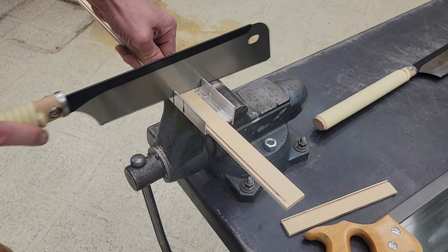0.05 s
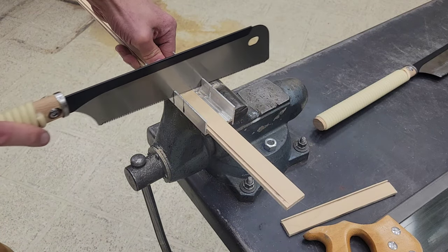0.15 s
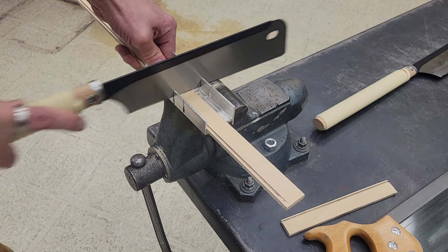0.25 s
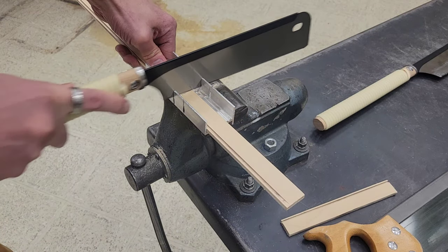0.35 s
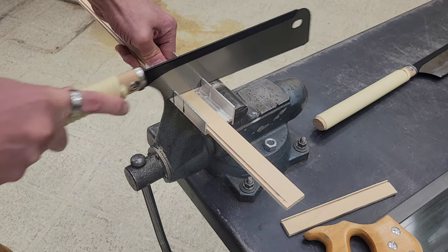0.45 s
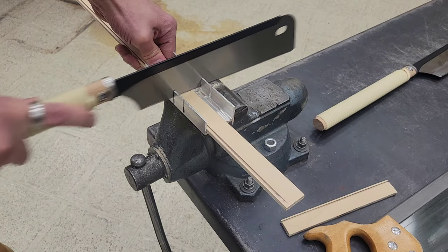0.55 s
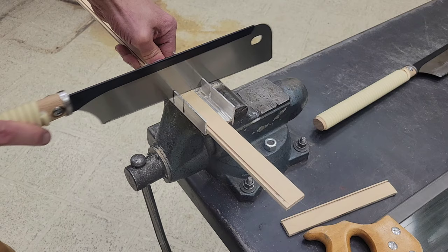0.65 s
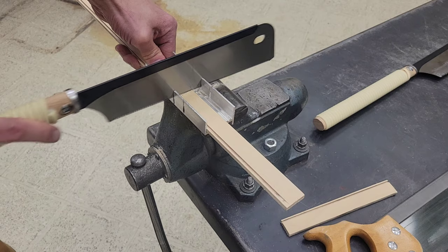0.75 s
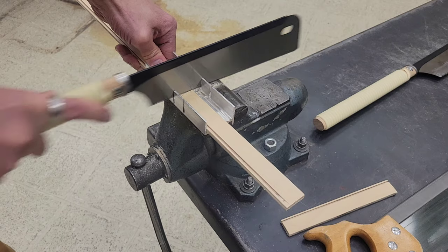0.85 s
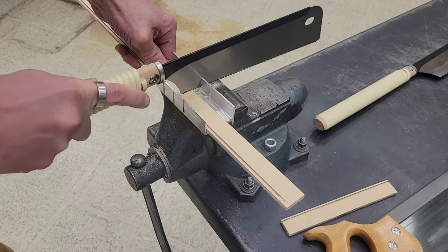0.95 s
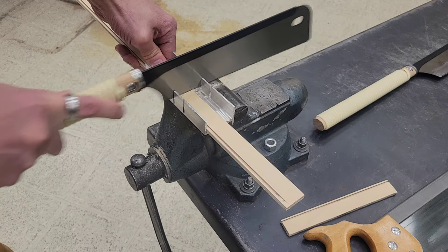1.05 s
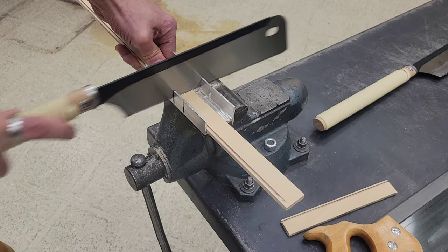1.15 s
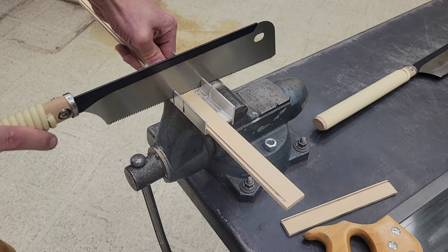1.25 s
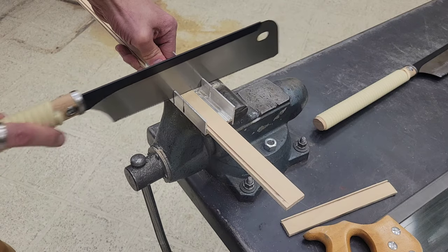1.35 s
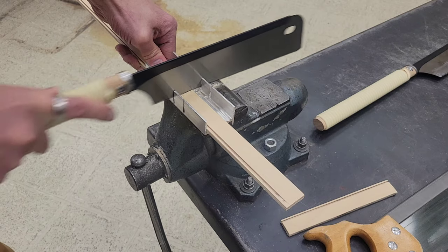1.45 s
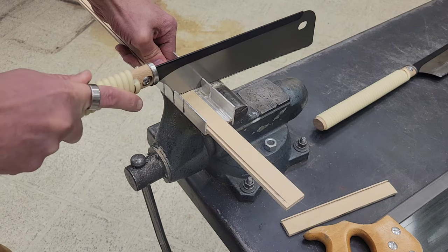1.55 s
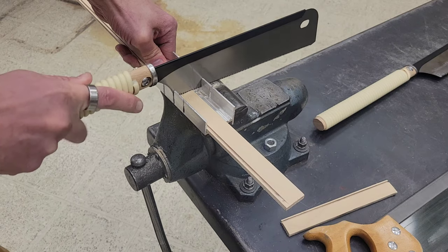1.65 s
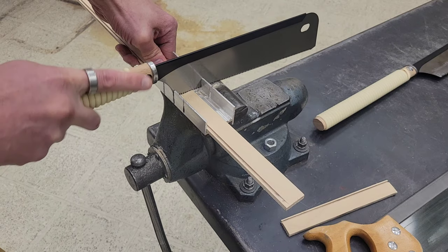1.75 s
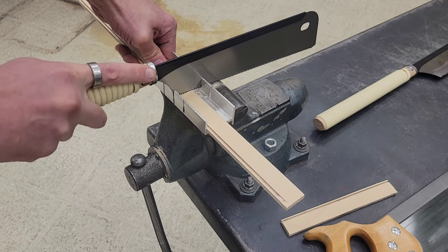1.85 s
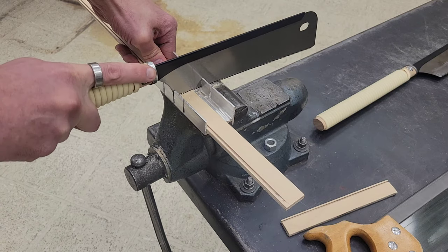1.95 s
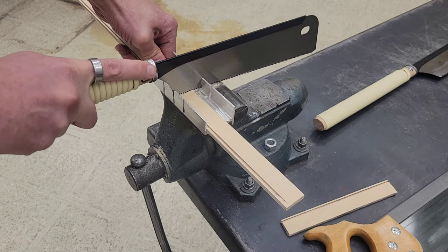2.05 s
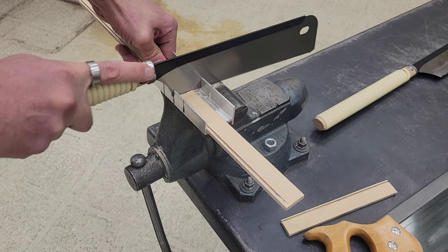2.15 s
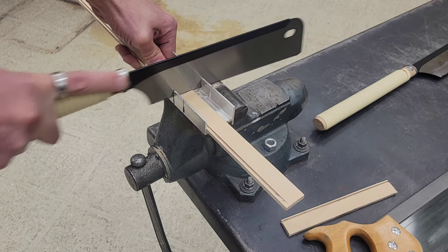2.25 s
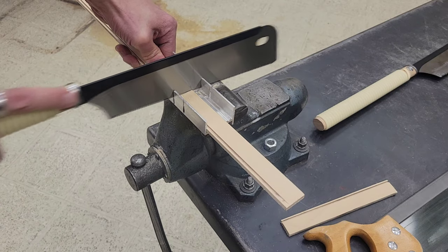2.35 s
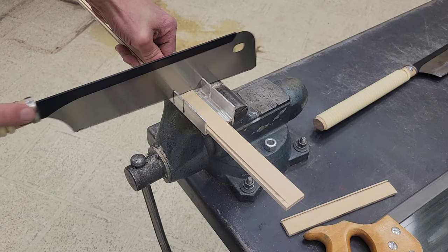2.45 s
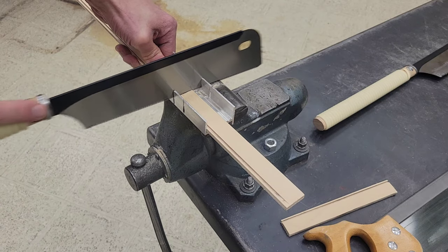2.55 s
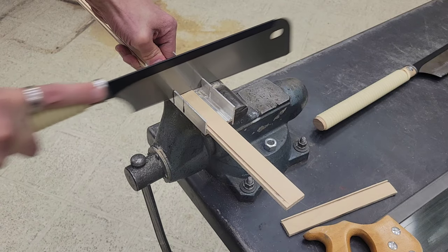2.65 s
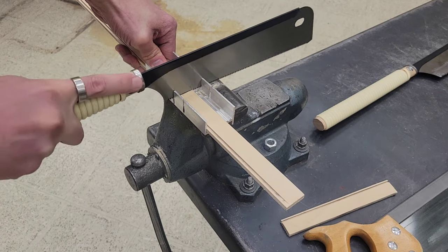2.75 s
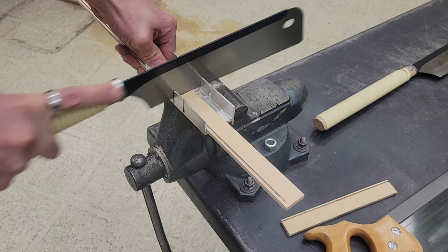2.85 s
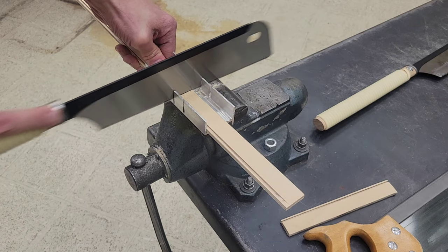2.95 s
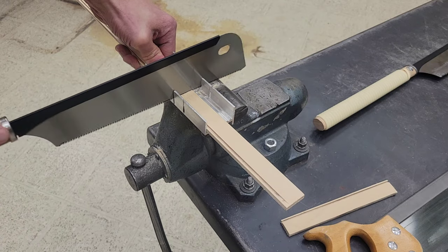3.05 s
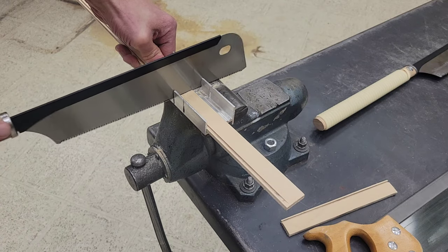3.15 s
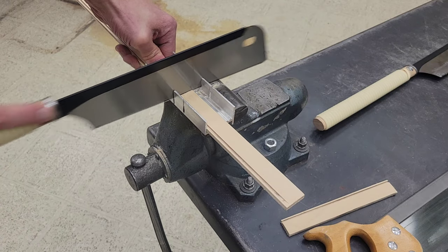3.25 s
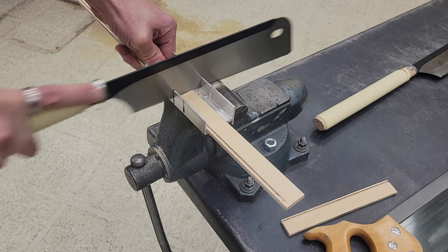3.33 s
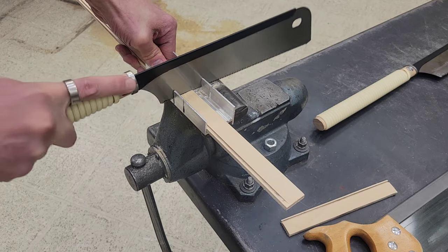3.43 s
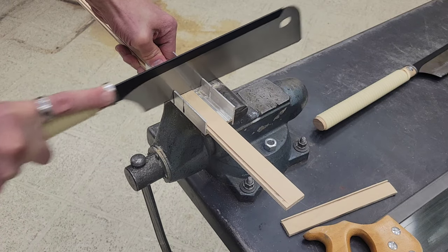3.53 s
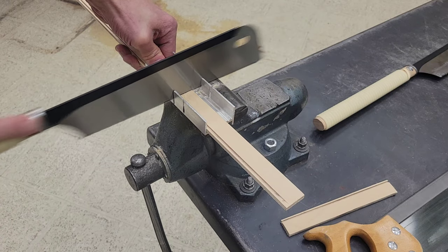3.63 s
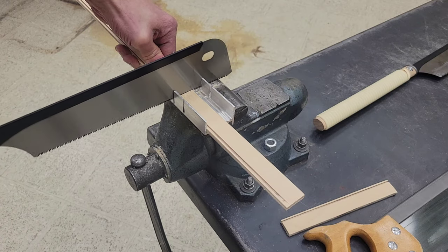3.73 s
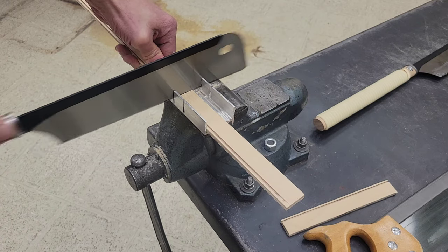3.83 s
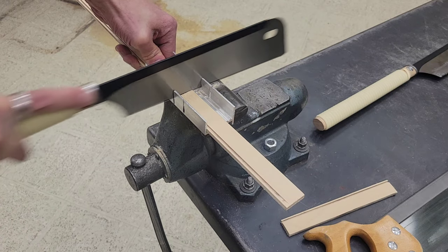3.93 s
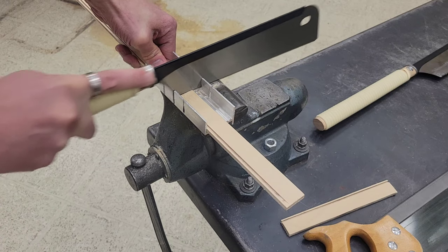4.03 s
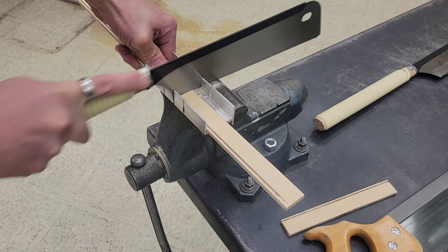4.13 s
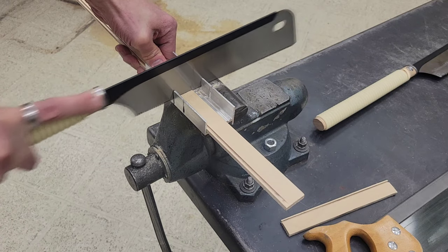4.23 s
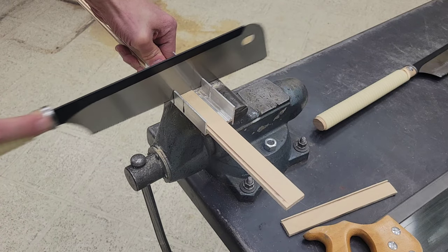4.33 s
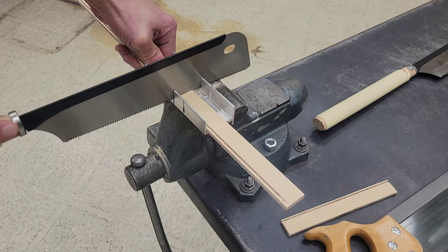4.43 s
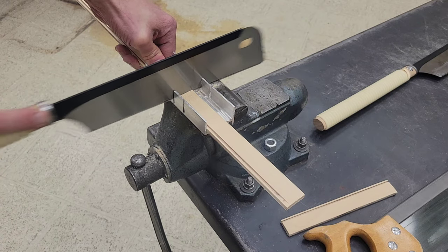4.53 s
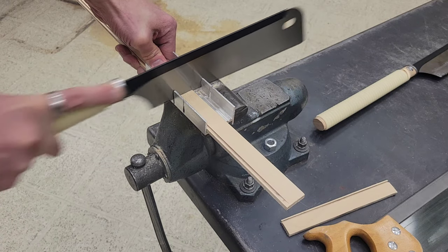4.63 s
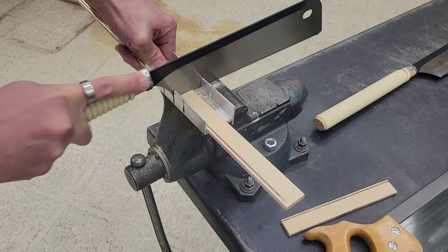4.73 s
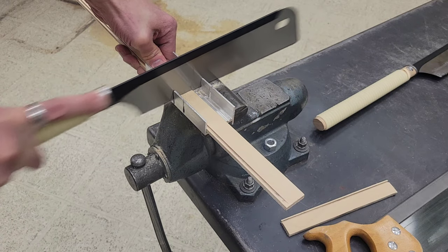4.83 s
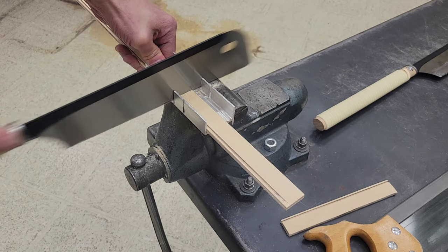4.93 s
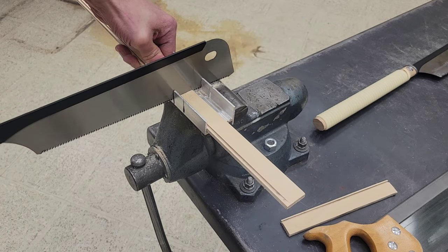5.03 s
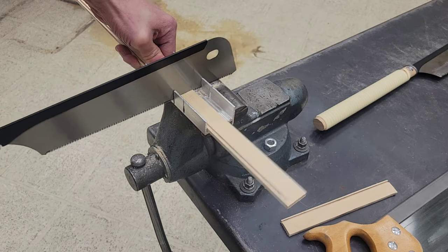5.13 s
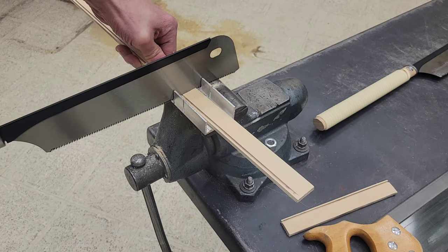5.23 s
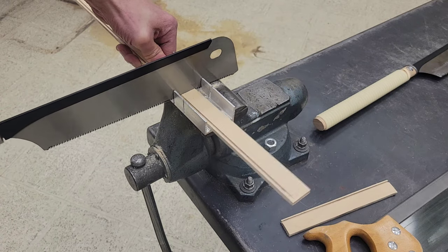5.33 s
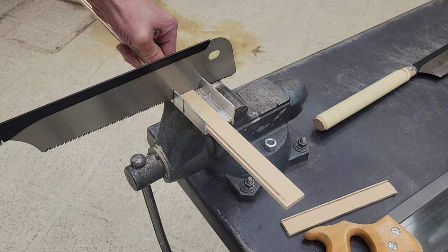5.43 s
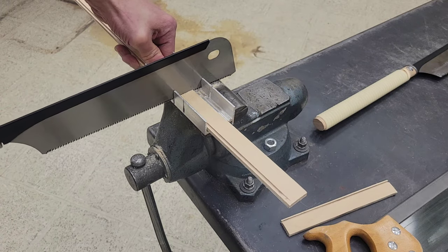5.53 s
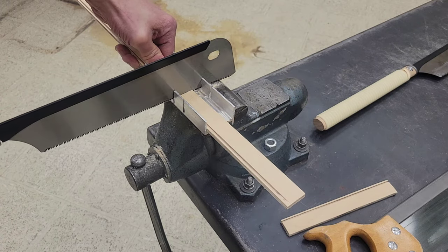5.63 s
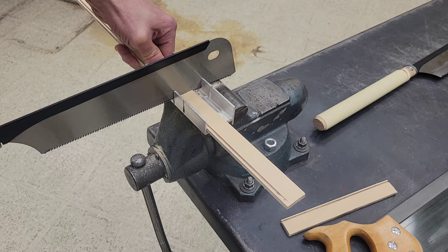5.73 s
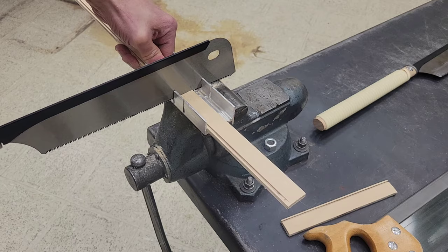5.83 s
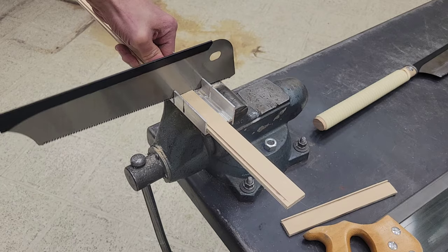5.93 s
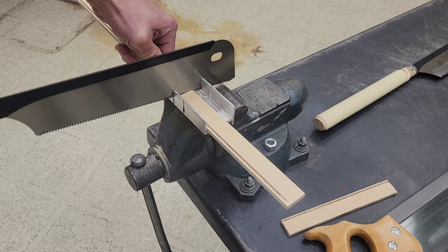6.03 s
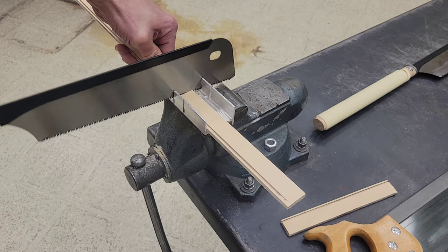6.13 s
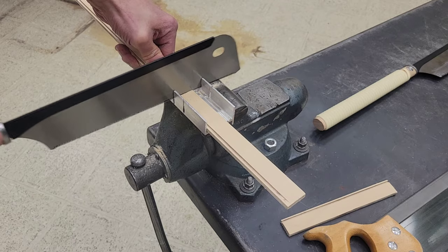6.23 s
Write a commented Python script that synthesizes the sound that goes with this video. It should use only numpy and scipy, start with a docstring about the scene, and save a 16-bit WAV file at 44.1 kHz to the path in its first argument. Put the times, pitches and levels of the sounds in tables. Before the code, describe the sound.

Close stereo sound of hand sawing thin wood held in a vice: bright gritty rasp and fine hiss swelling and fading with each stroke, teeth snagging dryly, the strip buzzing low. Very high, thin, fluttering metallic squeals burst at stroke ends. After a short gap the sawing returns harder, then halts, leaving soft ticks, a light knock and a faint drag in a quiet small workshop.

```python
"""In a small workshop, a thin pull saw cuts a wooden strip held in a vice: quick strokes, a pause, more strokes, rest.
Noise coloured as wood body, rasp and fine hiss follows the blade's speed; single teeth snag with dry scratches.
The strip thrums as a wavering low tone. The binding blade squeals on two drifting tones near 10 kHz.
Light knocks ring a set of decaying modes; late on, the saw ticks against the work and a faint stroke follows.
A short diffuse room tail answers saw and squeal, over a low rush of air."""
import sys
import numpy as np
from scipy import signal
from scipy.fft import rfft, irfft, next_fast_len
from scipy.io import wavfile
from scipy.ndimage import uniform_filter1d, minimum_filter1d, map_coordinates

SR = 44100
rng = np.random.default_rng(int(sys.argv[2]) if len(sys.argv) > 2 else 0)


def transcribe(signal):
    """Save signal, clipped to [-1, 1], as a 16-bit WAV file at the path in sys.argv[1]."""
    frames = np.atleast_2d(signal).T
    limited = np.clip(frames, -1, 1)
    pcm = np.round(limited * 32767).astype(np.int16)
    wavfile.write(sys.argv[1], SR, pcm)


N = 276948
TIME = np.arange(N) / SR

# All event levels below are relative, ahead of the trims in the mix.
# Saw strokes, pull and push in turn; in the weak ones the blade only creeps:
# (t/s, length/s, rasp level/dB, fastest moment/share of length, wood body over rasp/dB)
SAW_STROKES = [ (-.154, 0.3, -42.5, 0.62, -1.5), (0.132, 0.32, -37.5, 0.59, -5.5),
               (.416, 0.29, -37, 0.6, -3.5), (.682, 0.31, -37, 0.7, -2), (.98, .305, -38, .48, 2),
               (1.19, .15, -57, .4, 0), (1.304, 0.31, -42.5, 0.43, -1.5), (1.449, 0.84, -71, 0.34, 7),
               (1.96, 0.22, -69, 0.51, 8), (2.13, 0.41, -37.5, 0.55, -3.5),
               (2.488, 0.32, -38.5, 0.62, -1.5), (2.773, 0.36, -39, 0.37, 0.5), (3.098, 0.4, -41, 0.72, -2),
               (3.459, .314, -39.5, .68, -2), (3.759, 0.37, -37, 0.62, -8.5),
               (4.096, 0.39, -35, 0.42, -2.5), (4.449, 0.29, -36, 0.65, -4), (4.732, 0.3, -34, 0.45, -7.5),
               (4.954, 0.49, -66.5, .2, 0.5), (5.122, .1, -54, .5, -7), (6.175, .35, -53.5, 0.33, -5), ]
# Powers of the blade speed for wood body, rasp and fine hiss [no unit]
SPEED_POWERS = [1.17, 1.7, 0.91]
# Side to which the squealing blade radiates: (t/s, left over right/dB)
BLADE_AIM = [(.3, -0.5), (1.4, 0), (2.3, 2.5), (2.6, -4.5), (3.05, -6), (3.9, -1.5), (4.6, -5.5),
             (4.9, -3.5)]
# Teeth catching in the wood: (t/s, level/dB, t60/s)
TOOTH_CATCHES = [(.076, -20, .05), (1.071, -20, 0.027), (2.168, -39.5, .1), (2.823, -28, .03),
                 (3.165, -29.5, 0.04), (5.155, -36, .1), (5.187, -39.5, 0.072), (5.347, -51, 0.0607),
                 (5.362, -48, .035), (5.374, -46, 0.077), (5.411, -41, 0.026), (5.914, -50.5, 0.064),
                 (5.96, -56, 0.15)]
# Light knocks of the saw on the work: (t/s, level/dB)
SAW_KNOCKS = [(.173, -38.5), (5.396, -53), (5.607, -52), (6.156, -40)]
# Ringing modes of a knock: (f/Hz, level/dB, t60/s)
STRIP_MODES = [(840, 0.5, 0.15), (939, -10.5, .07), (1680, -6.5, 0.04), (2140, 7, 0.026), (2400, 0, .06),
               (2945, -7, 0.066), (5609, -14.5, 0.098)]
# The strip starts to chatter: (t/s, time driven/s, level/dB, starting rate/Hz, rise of the rate/(Hz per s))
STRIP_CHATTERS = [ (-.08, 0.16, -31.5, 74, 1), (.52, 0.061, -25, 75, 9), (.66, 0.086, -37.5, 75.95, 29.5),
                  (1.02, 0.082, -30, 66.08, -1), (1.08, 0.036, -24.5, 67.74, 90),
                  (1.24, 0.041, -33, 87.65, -40), (2.18, .07, -40.5, 87, 2), (2.29, 0.118, -30, 86, 20),
                  (2.82, 0.14, -32.5, 74, -1.5), (2.97, 0.06, -36, 73.15, 0.5), (3.55, .08, -45.5, 85, 20),
                  (4.14, 0.1966, -28, 77.87, 46.5), (4.77, 0.2007, -38.5, 78, 100),
                  (5.05, 0.11, -49, 112.6, -3), ]
# The blade binds and squeals:
# (t/s, length/s, level/dB, swell over the length/dB, blade mode/blend from 0 lower to 1 upper)
BLADE_SQUEALS = [ (.215, 0.067, -18, 22, 0), (.81, 0.039, -41, -1.5, 0.22), (0.896, 0.077, -41, -6, 0.24),
                 (1.364, .078, -18.5, 14.5, 0.06), (1.446, 0.054, -18, -1, 0.038),
                 (1.5, 0.19, -41, -17.5, 0), (2.267, 0.017, -16, 4, .8), (2.299, 0.015, -26.5, 4, 1),
                 (2.542, .135, -18, 6.5, 0.09), (2.682, 0.093, -26.5, 0, 0), (3.011, .046, -13, -8, .7),
                 (3.222, 0.16, -14, 6, 0.086), (3.386, 0.027, -23, -0.5, 0), (3.544, .137, -11.5, -6.5, .8),
                 (3.824, 0.091, -19, 13.5, 0.12), (4.268, .018, -19.5, -0.5, 0.75),
                 (4.381, 0.015, -16, 3.5, 1), (4.506, 0.13, -15.5, 3.5, 0.096),
                 (4.784, 0.036, -22.5, 10, 1), (4.848, 0.11, -12, -12, 0.91), ]

# Spectral shapes, each (f/Hz, relative level/dB): wood body, rasp of the steel, fine hiss of the teeth
BODY_COLOUR = [(40, -44), (100, -5.5), (150, -1.5), (200, -13.5), (245, -16.5), (430, -12), (630, -5),
               (750, -9.5), (900, -7), (1100, -8.5), (1400, -5), (2000, -6), (2600, -13), (4000, -62)]
RASP_COLOUR = [(500, -66.5), (1300, -20), (2200, -13), (2700, -8.5), (3150, 0.5), (3600, -3.5), (4150, -3),
               (4750, -3.5), (5500, -7), (6500, -16.5), (9000, -28), (12400, -45)]
HISS_COLOUR = [(3000, -52), (5000, -17.5), (6300, 0.5), (7700, -1), (8600, 1), (9400, -6), (10300, 6),
               (10900, -3.5), (11400, -3), (12200, 1), (14000, -2), (16000, -10)]
# Snagging teeth, fizz out of the kerf, rumble of the bench, air in the workshop: (f/Hz, relative level/dB)
SCRATCH_COLOUR = [(100, -38.5), (400, -8.5), (1500, -4.5), (2600, -1.5), (3100, -1.5), (4000, 0),
                  (5600, -1), (6500, 5), (7500, -2), (16000, -7.5)]
FIZZ_COLOUR = [(300, -62), (1500, -23.5), (5000, -8), (7500, -15), (9000, -4), (10200, 3.5), (11300, 4),
               (12500, -9.5), (16000, -27)]
BENCH_COLOUR = [(35, -35), (58, -8.5), (75, 12), (125, 5), (155, -4), (195, -9), (245, -3.5), (290, -5),
                (450, -15), (1000, -67.5)]
AIR_COLOUR = [(20, -26.5), (38, -3.5), (62, -4), (90, 3.5), (120, -0.5), (200, -6.5), (300, -14.5),
              (400, -8.5), (630, -19), (1000, -26.5), (2000, -34), (4000, -40.5), (8000, -43.5),
              (16000, -52)]
# Stereo width of the noise layers: (f/Hz, side over mid/dB)
STEREO_WIDTH = [(60, -25), (110, -25), (200, -23), (380, -9), (700, -11.5), (1290, -9), (2380, -0.5),
                (4400, 2), (8120, -1), (15000, -5)]
# Stereo balance of the noise layers: (f/Hz, left over right/dB)
STEREO_LEAN = [(60, 3), (110, -3), (200, 1), (380, -2), (700, -2.5), (1290, -3.5), (2380, 1), (4400, -1),
               (8120, -3), (15000, 5.5)]
# Decay of the room: (f/Hz, t60/s)
ROOM_DECAY = [(100, 1), (1000, 0.58), (5000, 0.3), (10000, 0.41), (16000, 0.083)]

CHATTER_RISE_S, CHATTER_T60_S, CHATTER_GLIDE_S = 0.042, .6, .3  # build-up, ring-down, time the rate glides
IDLE_SHAKE_DB = -48  # shake of the strip at the strongest rasp, even without chatter
LOWER_MODE_HZ, UPPER_MODE_HZ = 10085, 10328
SQUEAL_RISE_S, SQUEAL_T60_S = 0.0089, 0.077  # stick-slip takes hold; the wood damps the blade
SEED_DB = -36.5  # a self-excited vibration starts this far below its full swing
HISS_STALL = .25  # below this share of the top speed the teeth only rub and make no fine hiss
LEFT_LEAD_S, DIRECT_SHARE = .000068, .62  # head start at the left; share of the side that is direct
TOP_HZ = 16000  # band limit of the mix


def amp(db):
    """Decibels to gain."""
    return 10 ** (np.asarray(db) / 20)


def unit(x):
    """x at rms 1."""
    return x / np.sqrt(np.mean(x ** 2) + 1e-20)


def along(points, hz):
    """Interpolate (Hz, value) points on a log frequency axis."""
    f, v = np.transpose(points)
    return np.interp(np.log(hz + 1), np.log(f + 1), v)


def wobble(rate):
    """A smooth random curve with rate knots a second."""
    knots = rng.standard_normal(int(N * rate / SR) + 4)
    return map_coordinates(knots, [TIME * rate])


def filtered(x, response):
    """x shaped by a response of frequency."""
    size = next_fast_len(N + SR // 2)
    return irfft(rfft(x, size) * response(np.fft.rfftfreq(size, 1 / SR)), size)[..., :N]


def spread(pair, spectrum):
    """Two unrelated signals as coloured stereo sound that reaches the left first, its middle at rms 1."""
    def side_blend(hz):
        lead = DIRECT_SHARE * np.sin(2 * np.pi * hz * LEFT_LEAD_S)
        return np.array([1j * lead, np.sqrt(1 - lead ** 2)])

    def colour(hz):
        width = np.array([np.ones_like(hz), amp(along(STEREO_WIDTH, hz))])
        return amp(along(spectrum, hz)) * width

    across = filtered(pair, side_blend).sum(axis=0)
    mid, side = filtered(np.array([pair[0], across]), colour)
    left_right = np.array([mid + side, mid - side])
    both = filtered(left_right, lambda hz: amp(np.outer([.5, -.5], along(STEREO_LEAN, hz))))
    return both / np.std(both.mean(axis=0))


def patchy(depth_db):
    """Two noises whose resonances drift as the free length of the blade changes."""
    z = signal.stft(rng.standard_normal((2, N)), nperseg=1024)[2]
    field = rng.standard_normal(z.shape[1:])
    field = uniform_filter1d(field, size=6, axis=0)  # blurred over frequency
    field = uniform_filter1d(field, size=7, axis=1)  # blurred over time
    return signal.istft(z * amp(depth_db * unit(field)), nperseg=1024)[1][:, :N]


def envelope(start, length, rise_s, t60):
    """A self-excited vibration grows exponentially until it saturates, holds while driven, then rings down."""
    age = TIME - start
    growth = amp(SEED_DB * np.clip(1 - age / rise_s, -4, 4))
    saturated = growth / (1 + growth)
    return saturated * amp(-60 * np.maximum(age - length, 0) / t60)


def workshop_air():
    """The low rush of the workshop air: steady coloured noise."""
    return amp(-60.0) * spread(rng.standard_normal((2, N)), AIR_COLOUR)


def strokes():
    """Strength of wood body, rasp and hiss: the blade's speed is a lopsided half sine in every stroke."""
    powers = np.c_[SPEED_POWERS]
    energy = np.zeros((3, N))
    for s, length, db, fastest, body_db in SAW_STROKES:
        span = (TIME > s) & (TIME < s + length)
        course = np.interp(TIME[span], [s, s + fastest * length, s + length], [0, 1, 0])
        speed = np.sin(np.pi / 2 * course)
        hiss_speed = np.interp(speed, [HISS_STALL, 1], [0, 1])
        drive = np.array([speed, speed, hiss_speed])
        levels = amp([[db + body_db], [db], [db]])
        energy[:, span] += (levels * drive ** powers) ** 2
    return np.sqrt(energy)


def teeth(speed, top_rate_hz, scatter_db, snap_s):
    """Each tooth tears a few fibres: a short burst of its own strength, at a rate that follows the speed."""
    rate_hz = top_rate_hz * speed * amp(2.5 * wobble(300))
    passed = np.floor(np.cumsum(rate_hz) / SR)
    strength = amp(scatter_db * np.clip(rng.standard_normal(N), -2, 2))
    bites = np.diff(passed, prepend=0) * strength
    bursts = signal.lfilter([1], [1, -np.exp(-1 / (snap_s * SR))], bites)
    return unit(bursts * np.sqrt(speed))


def sawing(body_force, force, hiss_force, shake, swing):
    """Teeth rasp through the wood, pressed in and out of the cut by the chattering strip."""
    speed = np.clip(np.sqrt(force / force.max()), .15, 1)  # estimated from the rasp strength
    bite = teeth(speed, top_rate_hz=520, scatter_db=-1.0, snap_s=0.0006)
    texture = unit(np.sqrt(1.9 + bite ** 2))  # the constant keeps sound between the bites
    grip = 1 + .6 * shake / shake.max() * np.cos(swing)
    tearing = grip * amp(1.7 * wobble(35) - 1.0) * texture
    body = amp(-0.84) * body_force * spread(patchy(depth_db=3.3), BODY_COLOUR)
    rasp = amp(-1.0) * force * spread(patchy(depth_db=3.4), RASP_COLOUR)
    hiss = amp(-4.5) * hiss_force * spread(patchy(depth_db=2.6), HISS_COLOUR)
    return tearing * (body + rasp + hiss)


def chatter(force):
    """Level and phase of the strip's swing: a pull sets it going, and it rings on through the next push."""
    shake = amp(IDLE_SHAKE_DB) * np.sqrt(force / force.max())
    rate_hz = np.zeros(N)
    for s, length, db, start_hz, glide in STRIP_CHATTERS:
        shake = np.hypot(shake, amp(db) * envelope(s, length, CHATTER_RISE_S, CHATTER_T60_S))
        gliding_hz = start_hz + glide * np.minimum(TIME - s, CHATTER_GLIDE_S)
        rate_hz = np.where(TIME >= s, gliding_hz, rate_hz)  # the newest chatter sets the rate
    swing = 2 * np.pi * np.cumsum(rate_hz * (1 + 0.04 * wobble(40))) / SR
    return shake, swing


def thrum(shake, swing):
    """The strip swings in its lowest bending mode; a weak shake is mostly an uneven rumble of the bench."""
    locked = shake / (shake + amp(-50))
    tone = np.sin(swing) + amp(-18.5) * np.sin(2 * swing)
    strip = np.sqrt(2) * tone * amp(1.1 * wobble(23))
    bench = spread(rng.standard_normal((2, N)), BENCH_COLOUR)
    bench_gain = amp(-8.5) + amp(-1.5) * (1 - locked)
    return shake * (locked * strip + bench_gain * bench)


def snagging():
    """Single teeth snag with a dry scratch: patchy noise under a fast rise and an exponential decay."""
    snags = np.zeros(N)
    for s, db, t60 in TOOTH_CATCHES:
        age = np.maximum(TIME - s, 0)
        rise = 1 - np.exp(-age / (.025 * t60))  # longer scrapes also start more softly
        snags += rise * amp(db + 1.5 - 60 * age / t60)
    scratch = spread(patchy(depth_db=3), SCRATCH_COLOUR)
    return amp(-9.0) * snags * amp(1.0 * wobble(300)) * scratch


def knocking():
    """The saw knocks on the clamped strip: decaying modes of varying strength and a short noise crack."""
    knocks = np.zeros(N)
    t = np.arange(SR // 4) / SR
    for s, db in SAW_KNOCKS:
        ring = np.zeros(len(t))
        for hz, level, t60 in STRIP_MODES:
            ring += amp(level + rng.normal(0, 2.2) - 60 * t / t60) * np.sin(2 * np.pi * hz * t)
        crack = 1.19 * amp(-60 * t / 0.022) * rng.standard_normal(len(t))
        start = round(s * SR)
        knocks[start:start + len(t)] += (amp(db - 13.0) * (ring + crack))[:N - start]
    return knocks


def binding():
    """Strength of the lower and the upper blade mode: a squeal catches fast, swells or sags, and lets go."""
    energy = np.zeros((2, N))
    for s, length, db, swell_db, mode in BLADE_SQUEALS:
        swell = amp(db + swell_db * np.interp(TIME, [s, s + length], [-.5, .5]))
        squeal = swell * envelope(s, length, SQUEAL_RISE_S, SQUEAL_T60_S)
        turn = np.pi / 2 * mode  # equal-power blend of the two modes
        energy += np.outer([np.cos(turn), np.sin(turn)], squeal) ** 2
    return np.sqrt(energy)


def blade_mode(level, mode_hz, shake, swing):
    """Stick-slip locks on to a blade mode; passing teeth and chatter jostle its pitch and strength."""
    # The pitch drifts a little as the blade flexes in the kerf.
    pitch_hz = mode_hz + 18 * wobble(40)
    jostle = .52 * wobble(120) + .05 * wobble(700)
    jostle += .95 * np.sqrt(shake / shake.max()) * np.sin(swing)
    phase = 2 * np.pi * np.cumsum(pitch_hz) / SR + jostle
    # The grip of the kerf comes and goes, so the tone flutters.
    level = level * (1 + .7 * np.tanh(.8 * wobble(150)) + .05 * wobble(700))
    # The moving blade sweeps its narrow lobes of radiation across both sides.
    aim_db = np.interp(TIME, *np.transpose(BLADE_AIM))
    lobes = amp(np.outer([.5, -.5], aim_db) + 1.5 * np.array([wobble(70), wobble(70)]))
    skew = np.outer([.5, -.5], 1.35 + .7 * wobble(60))  # phase offset between left and right, rad
    # The vibrating teeth grind a bright fizz out of the kerf.
    fizz = amp(-24.5) * level * spread(rng.standard_normal((2, N)), FIZZ_COLOUR)
    return amp(5.0) * level * lobes * np.sin(phase + skew) + fizz


def workshop(x):
    """The room's answer: a diffuse noise tail, each frequency dying at its own speed."""
    hz, t, z = signal.stft(rng.standard_normal((2, SR // 2)), SR, nperseg=256)
    decay = amp(-60 * t / along(ROOM_DECAY, hz)[:, None])
    tail = signal.istft(z * decay, SR, nperseg=256)[1]
    tail = np.pad(tail / np.linalg.norm(tail[0]), ((0, 0), (180, 0)))  # starts about 4 ms late
    return signal.fftconvolve(x, tail, axes=1)[:, :N]


def scene():
    """Saw, strip and room over the low rush of the workshop air."""
    air = workshop_air()
    body_force, force, hiss_force = strokes()
    shake, swing = chatter(force)
    cut = sawing(body_force, force, hiss_force, shake, swing) + snagging() + knocking()
    lower, upper = binding()
    squeal = blade_mode(lower, LOWER_MODE_HZ, shake, swing)
    squeal += blade_mode(upper, UPPER_MODE_HZ, shake, swing)
    room = workshop(amp(-12.5) * cut + amp(-20.0) * squeal)
    return cut + squeal + thrum(shake, swing) + room + air


def record(dry):
    """A fast look-ahead limiter holds the peaks under full scale; then the band limit."""
    needed = np.minimum(1, .85 / (np.abs(dry).max(axis=0) + 1e-9))
    gain = uniform_filter1d(minimum_filter1d(needed, size=300), size=200)
    return filtered(dry * gain, lambda hz: hz < TOP_HZ)


dry = scene()
out = record(dry)
transcribe(out)
```